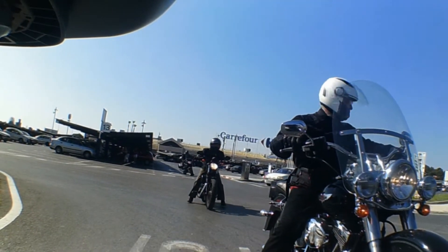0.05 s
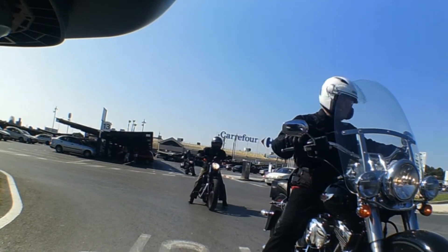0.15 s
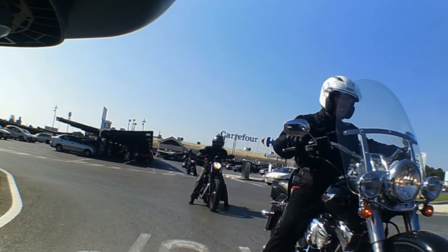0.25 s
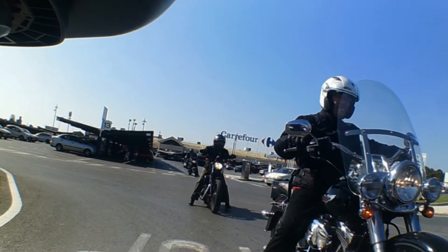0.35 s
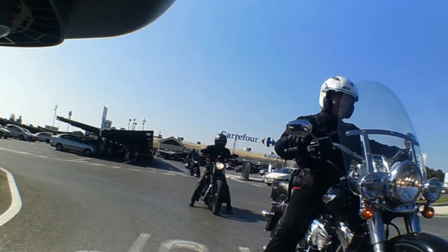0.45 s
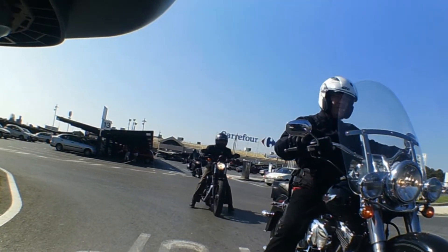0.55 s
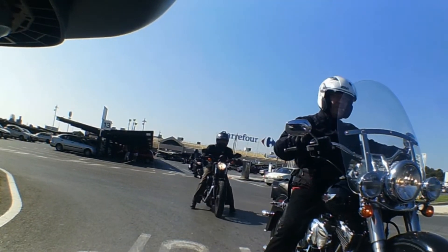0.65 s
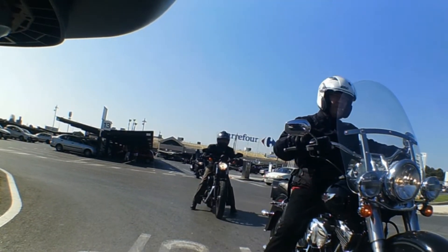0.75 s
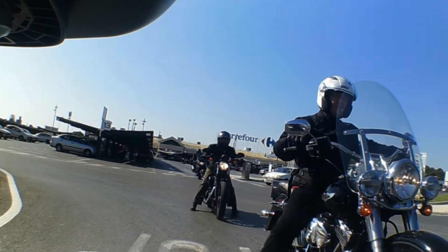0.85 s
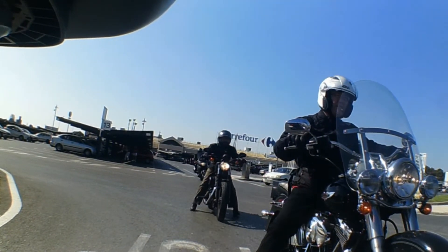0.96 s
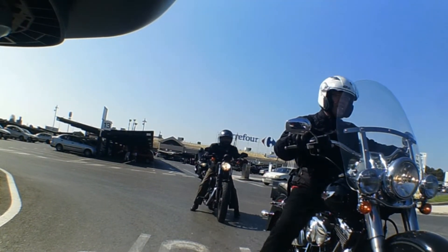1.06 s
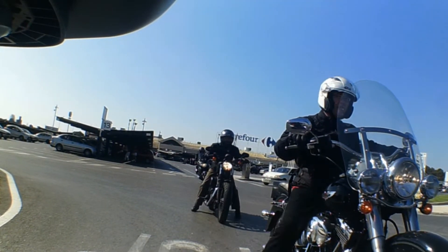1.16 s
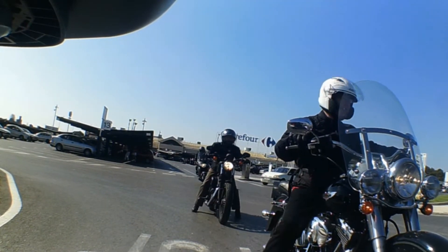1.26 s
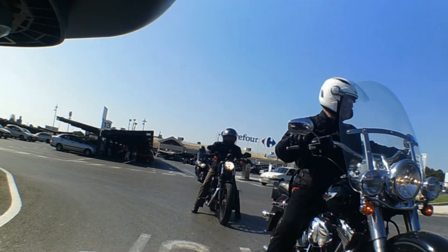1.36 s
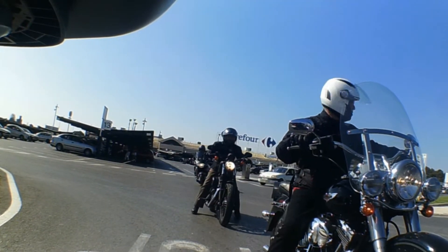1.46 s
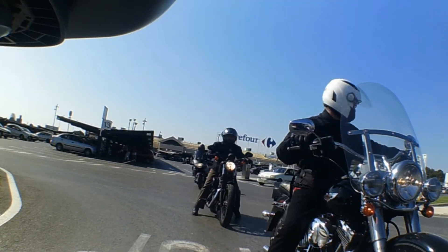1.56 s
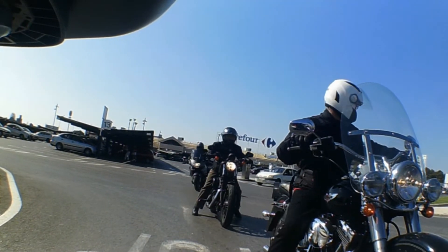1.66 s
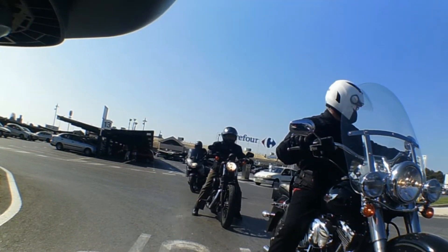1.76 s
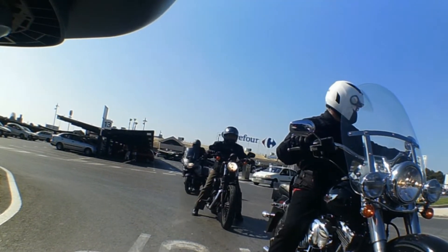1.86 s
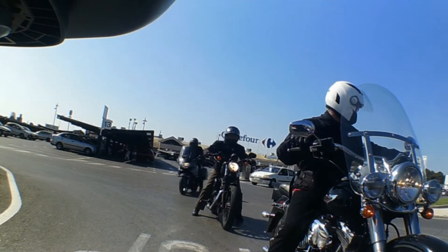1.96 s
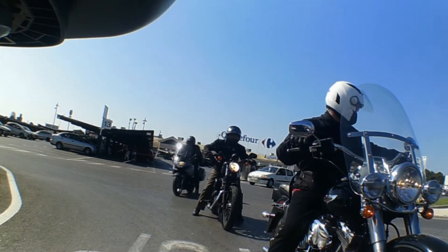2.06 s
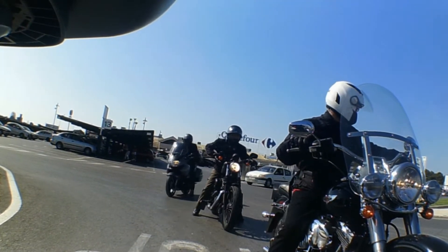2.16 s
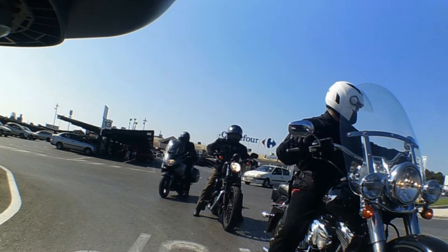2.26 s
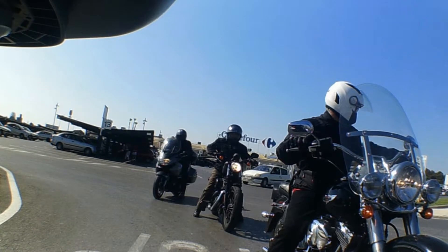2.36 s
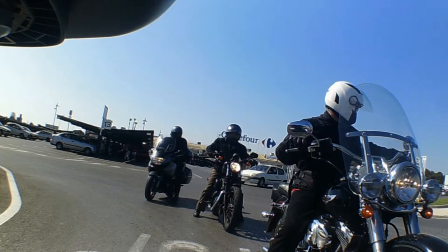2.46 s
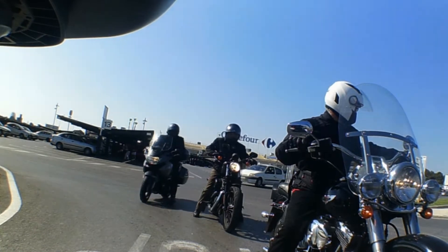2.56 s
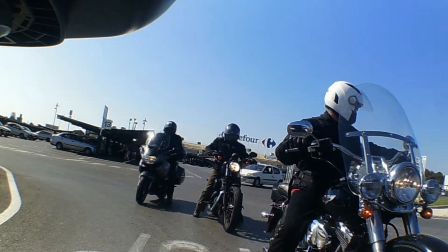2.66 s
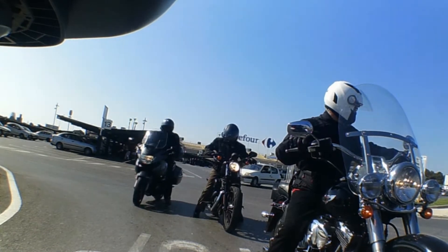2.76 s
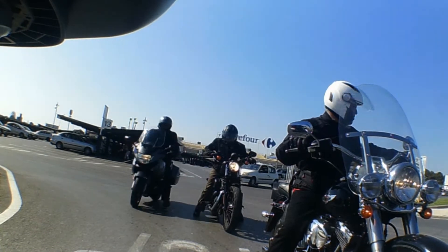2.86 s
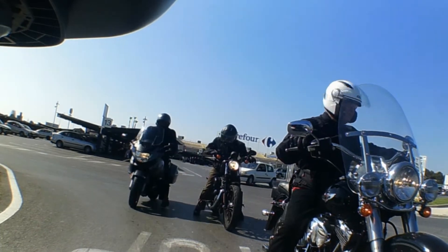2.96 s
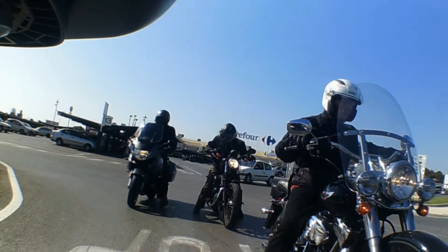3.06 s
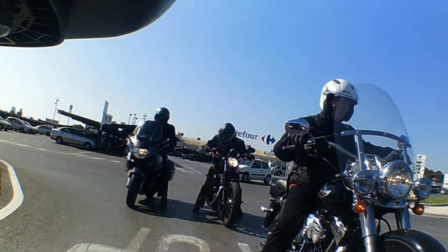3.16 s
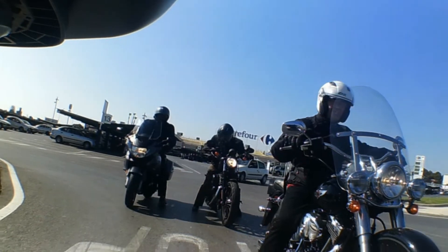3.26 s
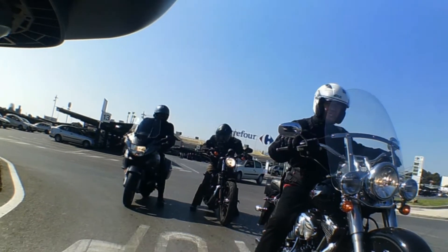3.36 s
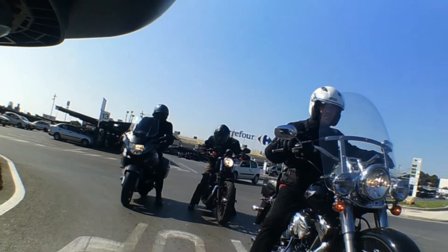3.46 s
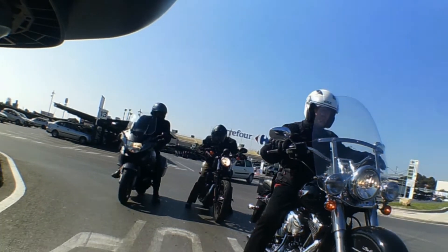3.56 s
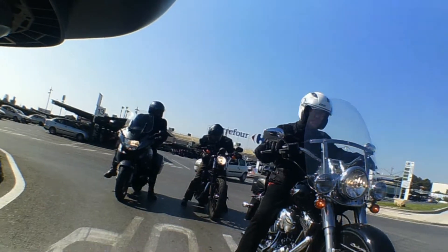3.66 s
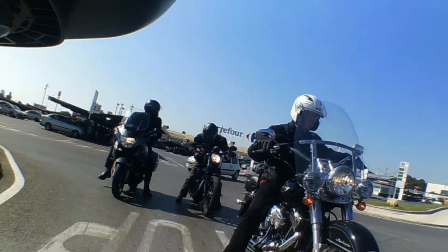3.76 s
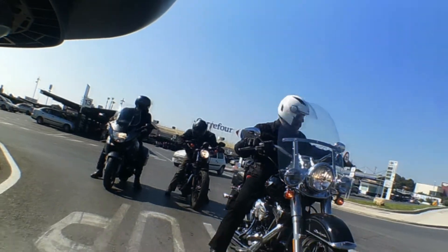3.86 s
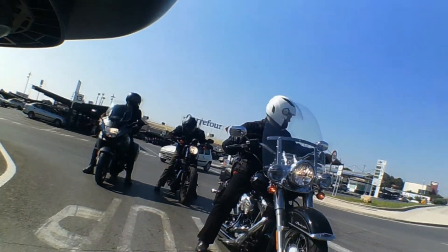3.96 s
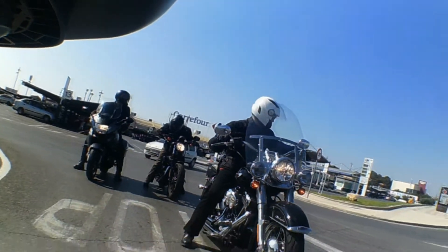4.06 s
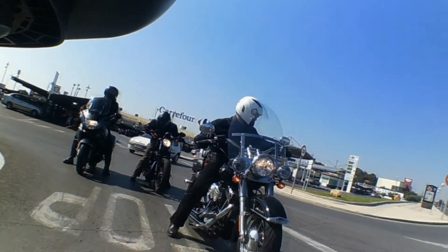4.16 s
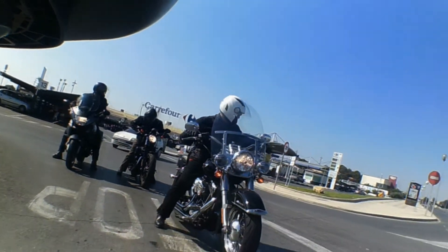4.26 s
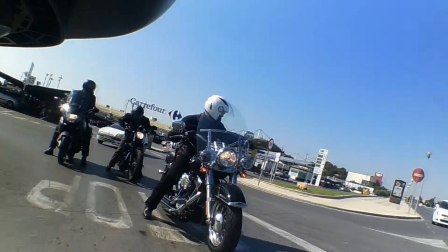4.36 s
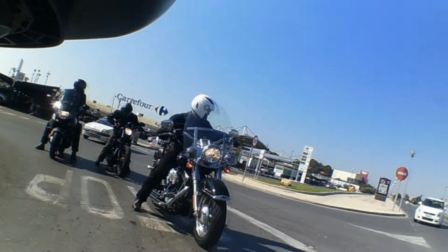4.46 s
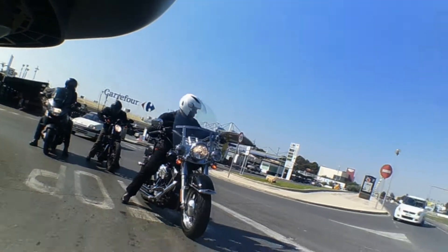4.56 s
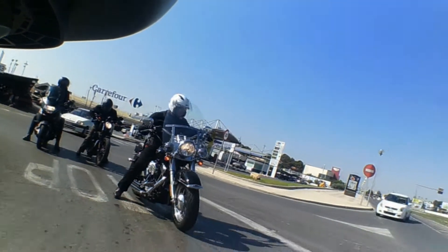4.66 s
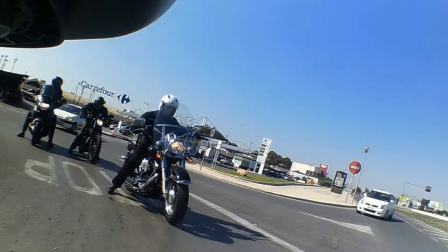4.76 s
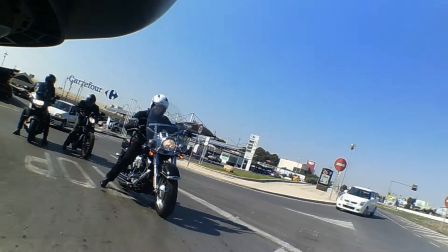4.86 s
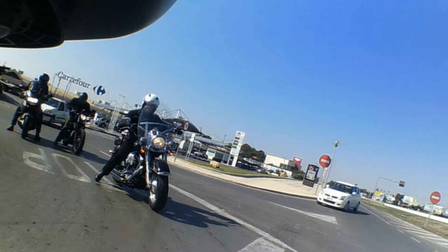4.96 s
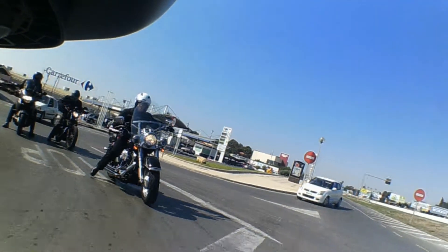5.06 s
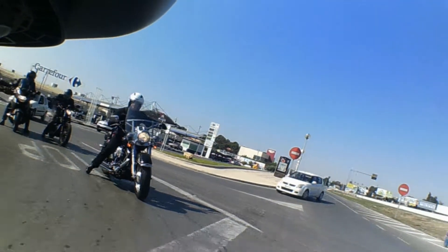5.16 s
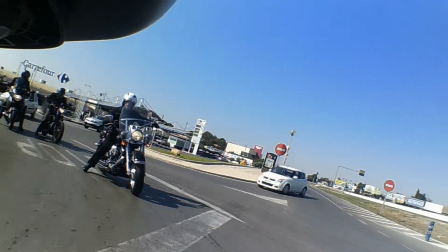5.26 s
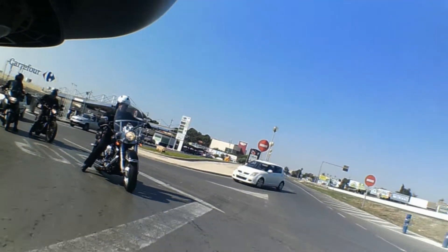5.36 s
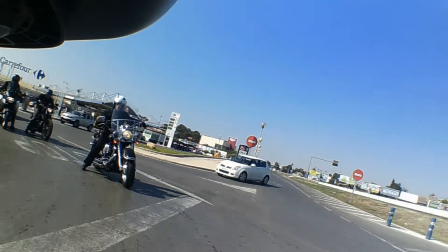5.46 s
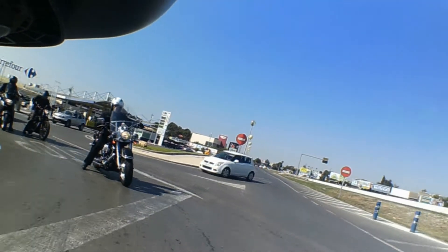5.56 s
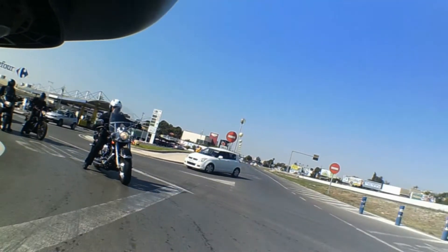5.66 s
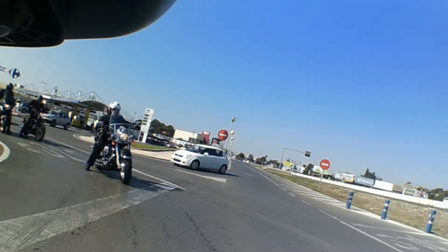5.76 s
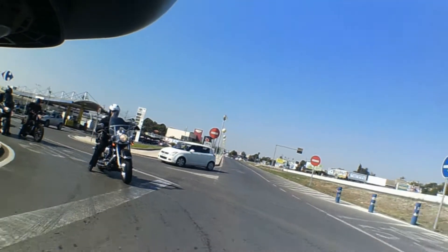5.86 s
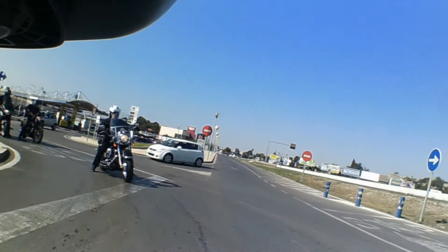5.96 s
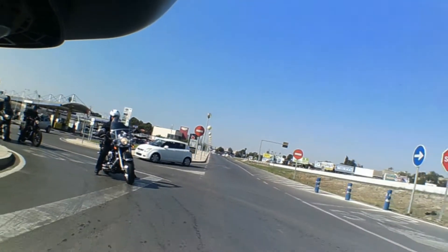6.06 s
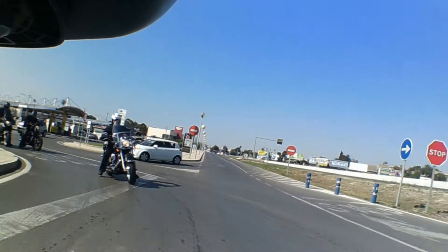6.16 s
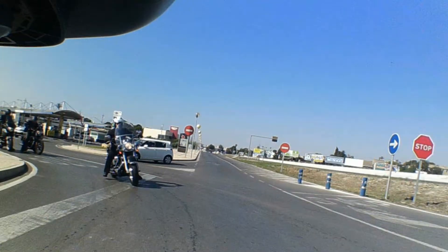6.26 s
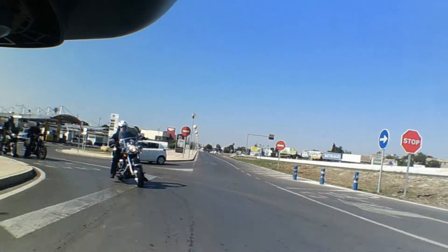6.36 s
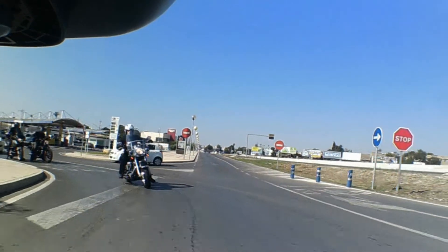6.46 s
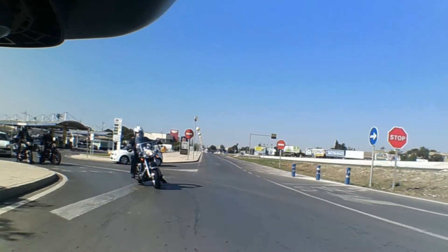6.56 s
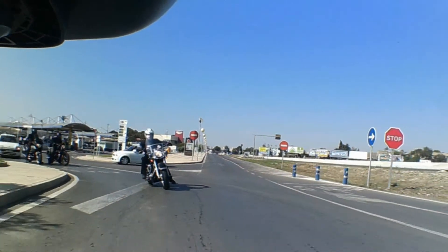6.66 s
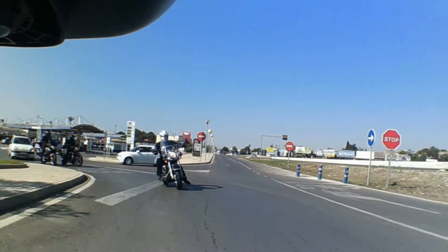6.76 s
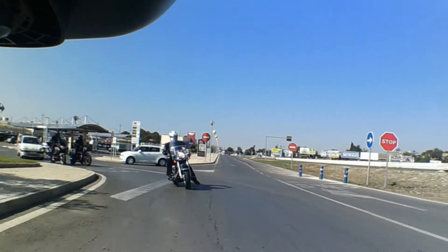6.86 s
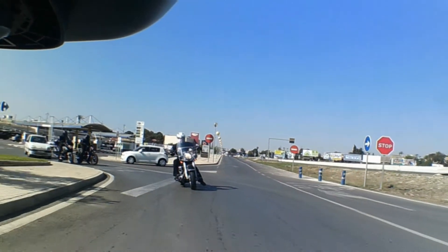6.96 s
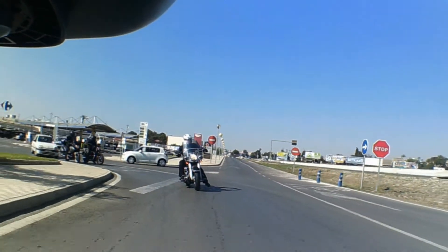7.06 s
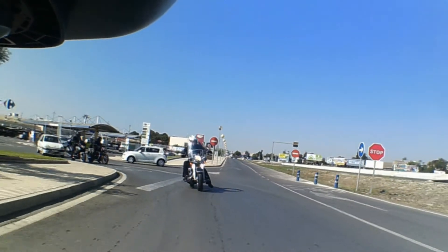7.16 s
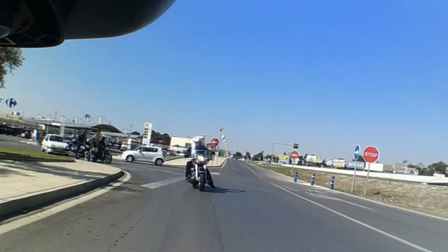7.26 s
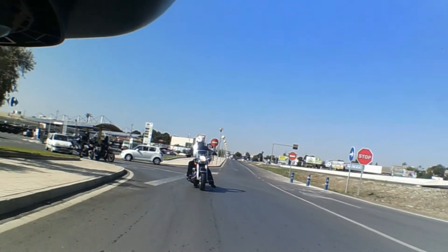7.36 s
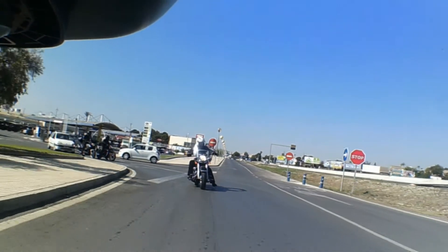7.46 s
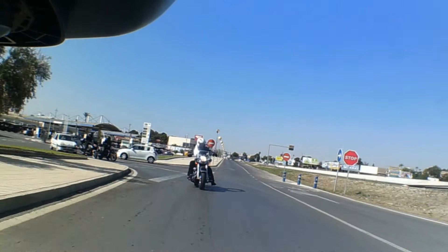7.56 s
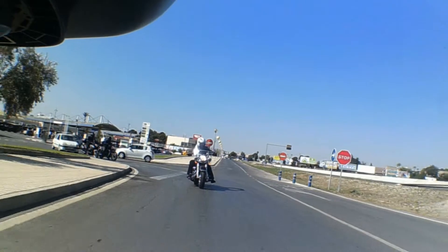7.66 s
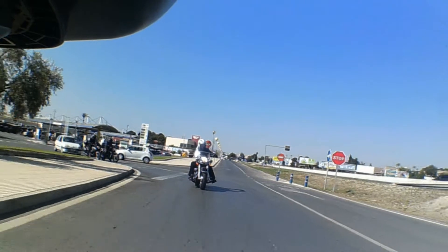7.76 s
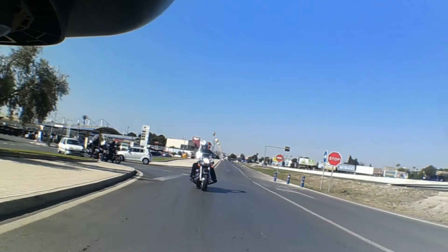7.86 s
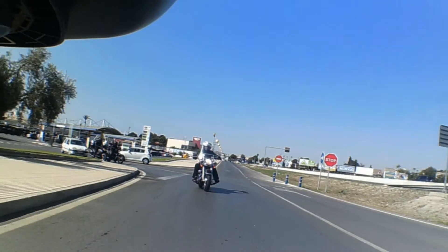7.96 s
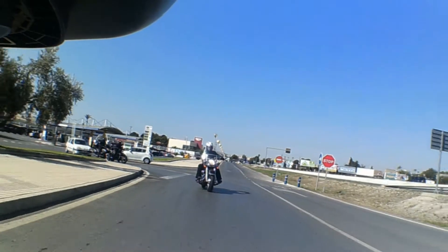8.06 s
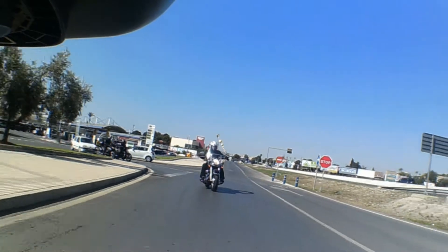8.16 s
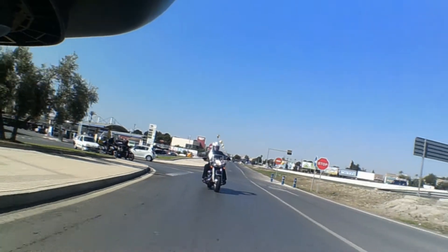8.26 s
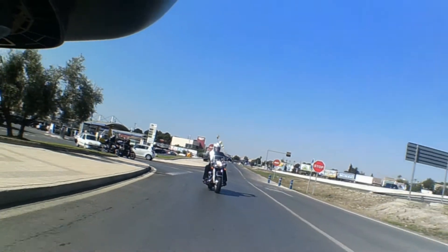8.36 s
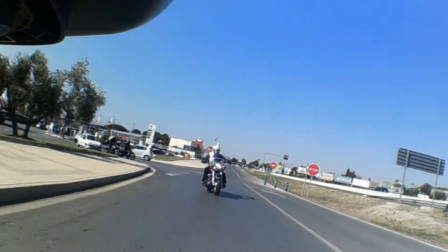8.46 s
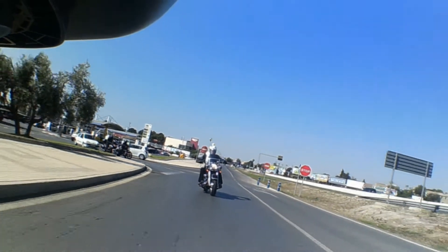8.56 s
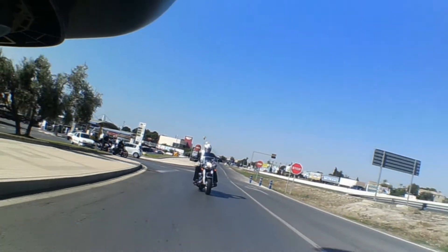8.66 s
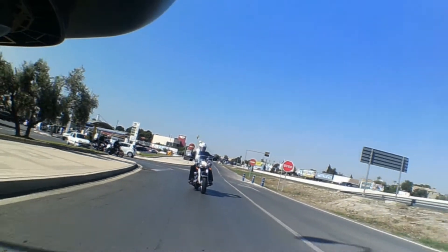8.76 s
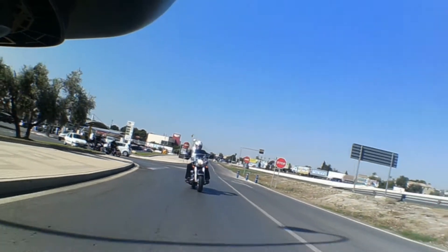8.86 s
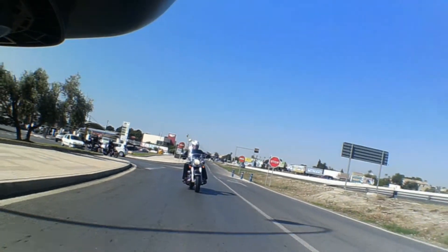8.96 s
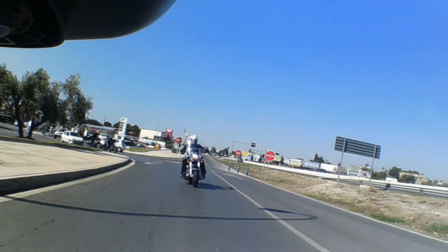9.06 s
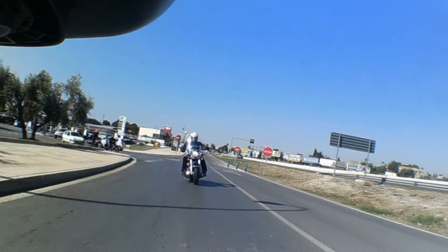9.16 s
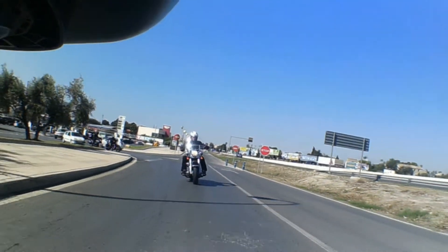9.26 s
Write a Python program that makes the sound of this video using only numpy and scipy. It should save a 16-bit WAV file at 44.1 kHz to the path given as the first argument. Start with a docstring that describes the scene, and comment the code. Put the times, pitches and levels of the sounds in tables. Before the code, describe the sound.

On-board motorcycle ride: rattling idle with soft chuffs, clutch snarl, rising engine whine, brief drop with clacks, pulling again, another twin rumbling behind.

```python
"""Riding out on a twin

The microphone rides on the tail of a twin-cylinder motorcycle that idles, pulls away, changes gear and pulls again.
Close by, firings pulse its pipes, and gear whine and rattle ring a housing that howls as the whine crosses it.
Behind, a twin cruiser fires in limping pairs and a third twin idles, swells and fades; shaped noise makes the wind.
Crank speed and load set the level of most engine parts; clacks shake the mount and loud peaks overload the mic."""
import sys
import numpy as np
from scipy import signal
from scipy.fft import rfft, irfft
from scipy.io import wavfile
from scipy.ndimage import uniform_filter1d, map_coordinates

SR = 44100
rng = np.random.default_rng(int(sys.argv[2]) if len(sys.argv) > 2 else 0)


def materialize(psi):
    """Save the field psi as 16-bit PCM at rate SR to the path in sys.argv[1].

    A 1-D psi becomes a single channel; in a 2-D psi each row is a channel.
    """
    bounded = np.clip(np.atleast_2d(psi).T, -1, 1)
    quanta = np.round(bounded * 32767).astype(np.int16)
    wavfile.write(sys.argv[1], SR, quanta)


N = 410130   # samples, 9.3 s

# Wind buffeting the microphone, rising along the ride. Each row: time in seconds, level in dB.
BUFFET_LEVEL = [(0, -53), (4.2, -39), (9.3, -31)]
# Colour of that wind. Each row: frequency in Hz, relative density in dB per Hz.
WIND_COLOUR = [(10, -27), (25, -16), (45, -2), (100, 10), (300, -33), (2000, -70)]

# The third twin idles, dips, swells near 5 s, then fades away. Each row: time in seconds, level in dB.
THIRD_TWIN_LEVEL = [(0, -29.5), (2.6, -28), (4.3, -32.5), (5.1, -24), (6.2, -39), (9.3, -62)]

# Crank of the cruiser behind. Each row: time in seconds, crank speed in turns per second.
CRUISER_SPEED = [(0, 14.7), (3.1, 14.7), (3.5, 21.4), (4.0, 23.6), (4.75, 32.8), (5.3, 35.4), (6.2, 21),
                 (6.6, 20), (7.5, 27), (8.5, 35.3), (9.3, 37)]
# It opens its throttle, eases off as it drops back, then follows.
# Each row: time in seconds, exhaust level in dB before the trims of beat and spit.
CRUISER_LEVEL = [(0, -34.5), (3.2, -35), (3.5, -26.5), (4.35, -24), (5.4, -29), (6.6, -37.5), (7.5, -37),
                 (8.05, -34), (9.3, -33.5)]
# Open pipes of the cruiser. Each row: resonance in Hz, width in Hz, gain in dB.
CRUISER_PIPE = [(87.6, 11.2, 7.5), (177.7, 53, 0), (205.7, 49, -3.5), (302, 38, -10.5), (533, 230, -16.5)]

# Jolts of the mount. Each row: time in seconds, relative strength in dB.
CLACKS = [(7.644, 8), (7.6584, 10.5), (7.7958, 1), (7.86, 3.5), (7.9545, 7), (8.0395, -2), (8.0624, 2.5),
          (8.3756, -5), (8.4275, -6), (9.095, 0), (9.18, 1), (9.197, 1.5), (9.2425, -2)]
# Body of the mount. Each row: resonance in Hz, width in Hz, gain in dB.
MOUNT = [(1356, 230, -3), (1510, 136, 3.5), (1970, 180, -6), (2395, 180, 1.5), (2540, 370, -1.5),
         (2880, 150, -3.5), (3930, 1500, -19.5)]
# Regular chuffs at idle, about every 0.4 s, and one later. Each row: time in seconds, relative strength in dB.
CHUFFS = [(0.979, -24.5), (1.389, -23.5), (1.789, -24.5), (2.197, -23.5), (2.595, -22), (3.26, -27.5)]

# Own engine idles, revs, is dragged down by the clutch, pulls, drops for the gear change and pulls again.
# Each row: time in seconds, crank speed in turns per second.
CRANK_SPEED = [(0, 19.55), (2.7, 19.55), (2.9, 27.5), (3.05, 31), (3.8, 27.4), (4.3, 23), (4.7, 20.6),
               (5, 22.6), (6, 32.7), (6.4, 36.1), (7, 40), (7.52, 43.2), (7.8, 29), (8, 23), (8.3, 20.7),
               (8.87, 20.2), (9.05, 30), (9.2, 32.5), (9.3, 31)]
# Pull on the drive. Each row: time in seconds, load from 0 to 1.
LOAD = [(0, 0), (2.7, 0), (3.3, 0.16), (4.0, 0.23), (4.55, 1), (4.95, 0.8), (5.35, 0.97), (5.8, 0.78),
        (6.05, 1), (7.5, 0.77), (7.68, 0), (8.85, 0.06), (9.1, 0.32), (9.3, 0.94)]

# The clutch takes up the drive. Each row: time in seconds, level in dB before the trims of snarl and hiss.
CLUTCH_LEVEL = [(0, -70), (3.6, -58), (4.6, -24), (4.95, -20.5), (5.4, -19), (5.8, -23.5), (6.2, -26),
                (6.7, -36), (9.3, -62)]
# Colour of the slipping plates. Each row: frequency in Hz, relative density in dB per Hz.
CLUTCH_RUB = [(500, -28), (850, 14), (1150, -19), (1700, 13.5), (2000, -1), (2350, 11), (2650, -26),
              (3300, -4), (8000, -57), (11500, -28), (15000, -53)]

# Ticking valve covers. Each row: resonance in Hz, width in Hz, gain in dB.
COVERS = [(2441, 61, 3.5), (3527, 106, 0.5), (3864, 115, 2), (4270, 335, -8.5), (4723, 220, -3),
          (5515, 146, -8.5), (5787, 91, -9), (6984, 117, -9.5), (9020, 310, -27), (11220, 880, -19.5)]
# Knocking cylinder head. Each row: resonance in Hz, width in Hz, gain in dB.
CYLINDER_HEAD = [(650, 410, 3), (2420, 1800, -17), (11400, 910, -19.5), (14500, 400, -27)]
# Colour of the chain hiss. Each row: frequency in Hz, relative density in dB per Hz.
CHAIN_HISS = [(1000, 17), (2500, -27), (4000, 0), (6000, -4), (8000, 0), (11000, -14), (13000, -27),
              (16000, -46)]

# Silencer of the exhaust. Each row: resonance in Hz, width in Hz, gain in dB.
SILENCER = [(68.8, 16.5, 2), (112, 13.2, -10.5), (277, 38, -20), (516, 77, -27)]
# Tailpipe, fed in proportion to the gas flow. Each row: resonance in Hz, width in Hz, gain in dB.
TAILPIPE = [(116.6, 42, -6.5)]
# Colour of the gas puffs. Each row: frequency in Hz, relative density in dB per Hz.
RASP = [(120, -20), (250, 5.5), (370, -4), (470, 2.5), (600, 3), (720, -1.5), (860, 3.5), (1100, -2.5),
        (1400, 0.5), (2000, -3.5), (4000, -32.5), (16000, -31)]
# Hum of the engine block. Each row: multiple of the crank rate, relative level in dB.
BLOCK_ORDERS = [(4, -4), (5, -1.5), (6, -1), (7, 0.5), (8, 1.5), (9, -10.5), (10, -3), (11, -5), (15, -6.5)]

# Gear whine. Each row: multiple of the tooth rate, relative level in dB.
MESH = [(3, 4.5), (4, 0), (5, -3), (6, -9)]
# Gear housing without load. Each row: resonance in Hz, width in Hz, gain in dB.
HOUSING_LOOSE = [(1467, 41.3, 2.5), (1647, 134, -12.5)]
# Gear housing under load. Each row: resonance in Hz, width in Hz, gain in dB.
HOUSING_LOADED = [(1503.7, 52, 0)]
# Outer gear case. Each row: resonance in Hz, width in Hz, gain in dB.
GEAR_CASE = [(1888, 60, -2.5), (2130, 67, -3), (2388, 31, 1), (2710, 76, -1), (2897, 70, -2.5)]
# Frame that carries the gear drone. Each row: resonance in Hz, width in Hz, gain in dB.
FRAME = [(540, 110, -3.5), (757, 23, 6), (1040, 110, 6)]

# How each engine part grows with speed and load.
# Each row: gain in dB at idle, dB per octave of crank speed, dB added at full load.
CLATTER = (-35.5, 8.6, 0.33)   # valve ticks on the covers
KNOCK = (-47, -2, 14.7)       # cylinder head
CHAIN = (-45, 5.6, 1.4)       # chain hiss
THUD = (-28, 4.9, 4.15)         # firings through the silencer
GAS = (-33.5, 2.8, 4.6)           # puffs of gas
SHAKE = (-37, 0, 1.6)       # frame rocking once a turn
BOOM = (-32.5, 5.5, -9)         # boom twice a turn
HUM = (-40.5, 8, 1)           # engine block
WHINE = (-17.5, 1.28, 15.26)       # gear whine as it drives the housing
RATTLE = (-30, 6.7, 5.5)     # backlash ringing the housing
CASE = (-39.5, 9.1, 6.2)         # outer gear case
DRONE = (-42.5, 7.3, 5.8)       # gears in the frame

IDLE_TURNS_PER_S = 19.55
START_TURN = .53   # where the crank stands at first
THROB_DB = 0.5   # swing of the whine either way, once a turn
LOAD_PUNCH = 0.93   # share of the steady noise that gathers into the firings at full load
HOUSING_BEND = 0.43   # the housing swings unevenly and adds the octave when it howls
TOOTH_JITTER_TURNS = .0014
VALVE_SCATTER_DB, THIRD_TWIN_SCATTER_DB, CRUISER_SCATTER_DB = 4, 4, 1.5
SPIT_DECAY_S = .003
KNOCK_DECAY_S, KNOCK_STEADY = .005, .35
CUTOFF_HZ = 15750   # top of the microphone chain


def from_db(db):
    """Decibels to gain."""
    return 10 ** (np.asarray(db) / 20)


def rms_one(x):
    """Scale to rms 1."""
    return x / np.sqrt(np.mean(x ** 2) + 1e-20)


def evened(x):
    """Hold the slow level near 1 and keep the single beats."""
    power = uniform_filter1d(uniform_filter1d(x * x, size=5000), size=5000)
    return x / np.sqrt(np.maximum(power, 1e-14))


def in_time(rows):
    """One curve over time for each column after the first."""
    s, *columns = np.transpose(rows)
    return [np.interp(np.arange(N) / SR, s, c) for c in columns]


def drift(rate):
    """Smooth random wander, spread near 1, with the given number of knots per second."""
    knots = rng.standard_normal(4000)
    coarse = np.arange(0, N + 20, 20)
    wander = map_coordinates(knots, [coarse / SR * rate], order=3, mode="wrap")
    return np.interp(np.arange(N), coarse, wander)


def noise(spectrum):
    """Noise of a given colour, rms 1."""
    hz, db = np.transpose(spectrum)
    bins = np.maximum(np.fft.rfftfreq(N, 1 / SR), 1)
    colour = from_db(np.interp(np.log(bins), np.log(hz), db))
    return rms_one(irfft(rfft(rng.standard_normal(N)) * colour, N))


def resonate(x, modes):
    """Parallel two-pole resonances of alternating sign."""
    out = np.zeros(N)
    for k, (hz, width, db) in enumerate(modes):
        r = np.exp(-np.pi * width / SR)
        poles = [1, -2 * r * np.cos(2 * np.pi * hz / SR), r * r]
        ringing = signal.lfilter([1, 0, -1], poles, x + 1e-18)
        out += (-1) ** k * from_db(db) * (1 - r * r) / 2 * ringing
    return out


def cut(x, hz, kind, order=2):
    """High- or low-pass."""
    return signal.sosfilt(signal.butter(order, hz, kind, fs=SR, output="sos"), x + 1e-18)


def fade(clicks, decay_s):
    """Each click jumps up and dies away."""
    return signal.lfilter([1], [1, -np.exp(-1 / (decay_s * SR))], clicks + 1e-18)


def strikes(events):
    """Single-sample clicks from rows of seconds and dB."""
    out = np.zeros(N)
    for s, db in events:
        out[int(s * SR)] += from_db(db)
    return out


def firings(turns, second_at, second_db, scatter_db):
    """Two cylinders fire once in two turns, the second a set number of turns after the first."""
    out = np.zeros(N)
    spread = np.broadcast_to(scatter_db, N)
    for offset, db in ((0, 0), (second_at, second_db)):
        at = np.flatnonzero(np.diff(np.floor((turns - offset) / 2)) > 0)
        chance = rng.standard_normal(400)[:len(at)]
        out[at] += from_db(db + spread[at] * chance)
    return out


def gated(clicks, decay_s, steady):
    """Envelope of puffs after the clicks, over a steady share."""
    return evened(evened(fade(clicks, decay_s)) + steady)


def scatter(x, delays_s, bounce):
    """Echoes inside the pipes and off the road smear each pulse and keep its colour (all-pass)."""
    z = -2j * np.pi * np.fft.rfftfreq(2 * N, 1 / SR)
    spectrum = rfft(x, 2 * N)
    bounce = np.clip(bounce, 0, .75)
    for delay in delays_s:
        late = np.exp(z * delay)
        spectrum = spectrum * (late - bounce) / (1 - bounce * late)
    return irfft(spectrum)[:N]


def gain_at(growth, speed, load):
    """Gain of a part at this crank speed and load."""
    idle_db, octave_db, load_db = growth
    return from_db(idle_db + octave_db * np.log2(speed / IDLE_TURNS_PER_S) + load_db * load)


def tooth_angle(turns, speed):
    """Phase of the meshing teeth; the crank surges once a turn, most when it turns slowly."""
    teeth = 14   # per turn
    slow = np.minimum(35 / speed, 1.08) ** 5
    surge = 0.0073 * slow * np.sin(2 * np.pi * turns) * (1 + 0.08 * drift(25))
    return 2 * np.pi * teeth * (turns + surge + TOOTH_JITTER_TURNS * drift(70))


def wind():
    """Air buffets the microphone as low, coloured noise."""
    buffet_db, = in_time(BUFFET_LEVEL)
    return from_db(buffet_db) * noise(WIND_COLOUR)


def third_twin():
    """Uneven firings of a wandering idle ring two low resonances."""
    level_db, = in_time(THIRD_TWIN_LEVEL)
    turns = np.cumsum(17.5 * (1 + 0.0212 * drift(6.4))) / SR
    fired = firings(turns, second_at=0.76, second_db=-9.0, scatter_db=THIRD_TWIN_SCATTER_DB)
    pulses = cut(resonate(fired, [(48.8, 27, -12), (81, 16.4, 5)]), 130, "low")
    return from_db(level_db) * evened(pulses)


def cruiser():
    """The twin close behind fires in limping pairs through open pipes, each with a spit of gas."""
    speed, = in_time(CRUISER_SPEED)
    level_db, = in_time(CRUISER_LEVEL)
    turns = np.cumsum(speed * (1 + 0.00413 * drift(8))) / SR + .7
    fired = firings(turns, second_at=.56, second_db=-3, scatter_db=CRUISER_SCATTER_DB)
    pulses = cut(cut(resonate(fired, CRUISER_PIPE), 40, "high"), 1320, "low")
    beat = evened(scatter(pulses, delays_s=[.0043, .0117], bounce=0.66))
    spit = noise(RASP) * gated(fired, decay_s=SPIT_DECAY_S, steady=0.11)
    spit = cut(spit, 2550, "low", order=3)
    return from_db(level_db + 3.0) * beat + from_db(level_db - 6) * spit


def clacks():
    """The mount cracks and chatters for a few milliseconds at each jolt."""
    hits = strikes(CLACKS)
    chatter = resonate(rng.standard_normal(N) * fade(hits, decay_s=0.0071), MOUNT)
    chatter = cut(chatter, 6000, "low")
    crack = cut(rng.standard_normal(N) * fade(hits, decay_s=.002), 3300, "low")
    return from_db(3.0) * chatter + from_db(-15) * crack


def chuffs():
    """Each chuff thumps, puffs and ticks."""
    hits = strikes(CHUFFS)
    thump = resonate(hits, [(81, 6.4, 62), (254, 20, 52.0), (550, 90, 38.7)])
    puff = noise(RASP) * fade(hits, decay_s=0.015)
    tick = cut(rng.standard_normal(N), 4000, "high") * fade(hits, decay_s=0.0083)
    return thump + from_db(2) * puff + from_db(-15) * tick


def clutch(turns, speed, fired):
    """Slipping plates hiss, and the loaded teeth snarl on their high harmonics."""
    level_db, = in_time(CLUTCH_LEVEL)
    angle = tooth_angle(turns, speed)
    teeth = sum(np.sin(k * angle + 2 * np.pi * rng.random()) for k in range(5, 12))
    teeth = cut(teeth, 3530, "low", order=6)
    snarl = evened(resonate(teeth, [(2130, 200, -2), (2410, 53, 5.5), (2790, 270, -7.5)]))
    snarl = snarl * from_db(2.6 * drift(90))
    hiss = noise(CLUTCH_RUB) * gated(fired, decay_s=.008, steady=6.1)
    return from_db(level_db - 5) * snarl + from_db(level_db - 5.5) * hiss


def valves_and_chain(turns, speed, load, fired):
    """Valves tick on the covers, the head knocks when the engine labours, the chain hisses with each firing."""
    valves = firings(turns + 0.36, second_at=0.79, second_db=0, scatter_db=VALVE_SCATTER_DB)
    ticks = rng.standard_normal(N) * gated(valves + fired, decay_s=0.002, steady=5.9)
    ticks = ticks * from_db(0.85 * drift(160))
    covers = evened(cut(resonate(ticks, COVERS), 14800, "low", order=4))
    blows = rng.standard_normal(N) * gated(fired, KNOCK_DECAY_S, KNOCK_STEADY)
    knock = evened(resonate(blows, CYLINDER_HEAD))
    hiss = noise(CHAIN_HISS) * gated(fired, decay_s=0.0026, steady=0.96)
    parts = [(CLATTER, covers), (KNOCK, knock), (CHAIN, hiss)]
    return sum(gain_at(growth, speed, load) * sound for growth, sound in parts)


def block_hum(turns):
    """The engine block hums on multiples of the crank rate, its level wavering."""
    hum = sum(from_db(db) * np.sin(2 * np.pi * (round(k) * turns + rng.random())) for k, db in BLOCK_ORDERS)
    return rms_one(hum) * from_db(1.0 * drift(13))


def exhaust(turns, speed, load, fired):
    """Firings thud through the silencer, each with a puff of gas; frame and block hum on the crank orders."""
    flow = (speed / 40) ** 2   # the tailpipe joins in as the gas flow grows
    pulses = resonate(fired, SILENCER) - resonate(fired * flow, TAILPIPE)
    pulses = cut(cut(pulses, 44.4, "high", order=3), 580, "low")
    thud = evened(scatter(pulses, delays_s=[.0031, .0073], bounce=0.63))
    rasp = noise(RASP) * gated(fired, decay_s=0.013, steady=8.9 * (1 - LOAD_PUNCH * load))
    shake = resonate(np.sin(2 * np.pi * turns), [(31.2, 18, 3)])
    boom = -resonate(np.sin(4 * np.pi * turns), [(65.2, 28, 1.4)])
    parts = [(THUD, thud), (GAS, rasp), (SHAKE, shake), (BOOM, boom), (HUM, block_hum(turns))]
    return sum(gain_at(growth, speed, load) * sound for growth, sound in parts)


def gear_whine(angle, turns):
    """Harmonics of the tooth rate, swinging in level once a turn and flickering."""
    whine = sum(from_db(db) * np.sin(round(k) * angle) for k, db in MESH)
    return evened(whine * from_db(THROB_DB * np.cos(2 * np.pi * turns) + 1.95 * drift(70)))


def gears(turns, speed, load, fired):
    """Whine and backlash rattle ring housing, case and frame; the housing howls as a harmonic crosses it."""
    angle = tooth_angle(turns, speed)
    whine = gain_at(WHINE, speed, load) * gear_whine(angle, turns)
    rattle = rng.standard_normal(N) * gated(fired, decay_s=0.0061, steady=9.5 * (1 - LOAD_PUNCH * load))
    rattle = rattle * from_db(1.05 * drift(70))
    howl = cut(resonate(whine, HOUSING_LOADED), 1297, "high", order=8)
    howl = howl + HOUSING_BEND * cut(howl ** 2, 2300, "high")
    # load stiffens the housing
    housing = resonate(rattle * (1 - load), HOUSING_LOOSE) + resonate(rattle * load, HOUSING_LOADED)
    ring = evened(cut(housing, 820, "high", order=3))
    case = evened(cut(resonate(rattle + from_db(-4) * whine, GEAR_CASE), 2100, "high"))
    drone = cut(resonate(np.sin(angle) + np.sin(2 * angle), FRAME), 1010, "low", order=8)
    drone = drone * from_db(2.5 * drift(40))
    direct = from_db(-27) * cut(whine, 1440, "high", order=6)
    parts = [(RATTLE, ring), (CASE, case), (DRONE, drone)]
    return howl + direct + sum(gain_at(growth, speed, load) * sound for growth, sound in parts)


def own_machine():
    """One crank drives the exhaust, gears, valves and clutch near the microphone; chuffs are added."""
    speed, = in_time(CRANK_SPEED)
    load = np.clip(in_time(LOAD)[0], 0, 1.2)
    lope = (IDLE_TURNS_PER_S / speed) ** 2   # firing is uneven at idle and steadies with speed
    turns = np.cumsum(speed) / SR + START_TURN + 0.02095 * lope * drift(8)
    fired = firings(turns, second_at=0.99, second_db=0.9, scatter_db=0.91 * lope)
    engine = sum(part(turns, speed, load, fired) for part in (valves_and_chain, exhaust, gears))
    return engine + clutch(turns, speed, fired) + chuffs()


def scene():
    """The air, the two other machines, the mount and the ridden machine at the microphone."""
    others = third_twin() + cruiser()
    return (wind() + others + clacks() + own_machine())[None]


def record(dry):
    """The microphone bends loud peaks to one side and overloads; the offset is blocked and the top is cut."""
    lopsided, knee = .4, .35
    heard = cut(dry, 13500, "low", order=4)
    bent = cut(heard + lopsided * (np.hypot(heard, knee) - knee), 11, "high")
    clipped = bent / (1 + np.abs(bent / 1.23) ** 10) ** (1 / 10)
    return signal.sosfilt(signal.ellip(12, .1, 100, CUTOFF_HZ, fs=SR, output="sos"), clipped)


dry = scene()
out = record(dry)
materialize(out)
```